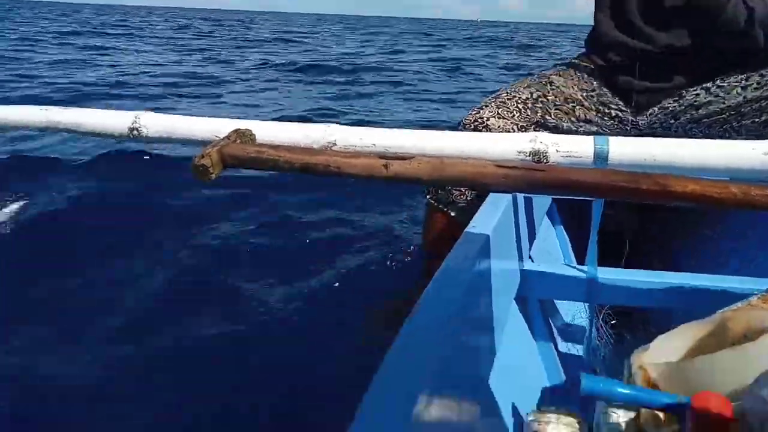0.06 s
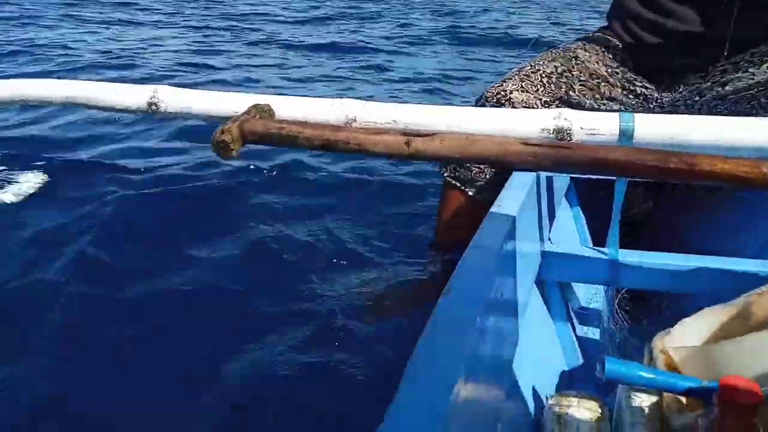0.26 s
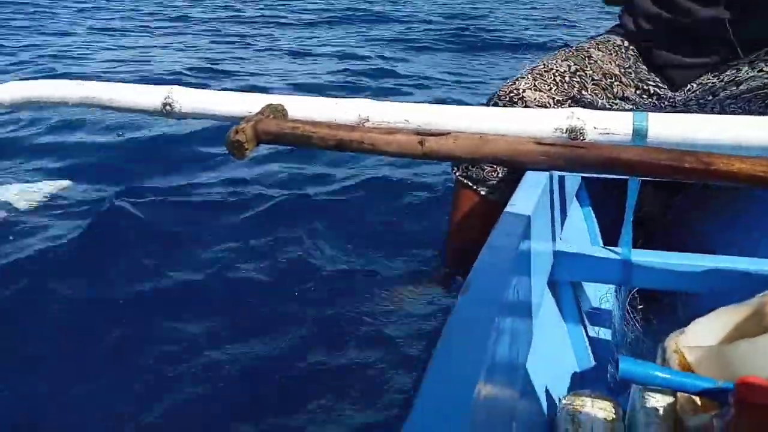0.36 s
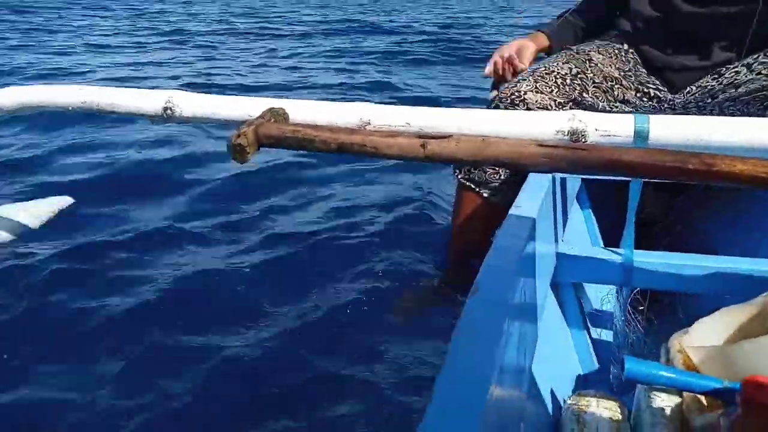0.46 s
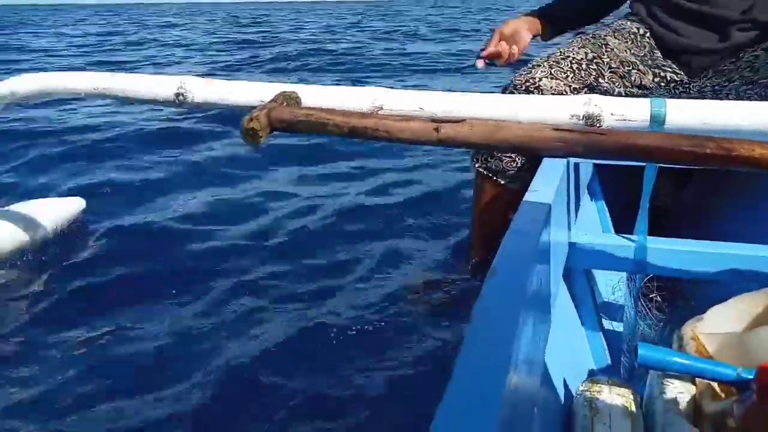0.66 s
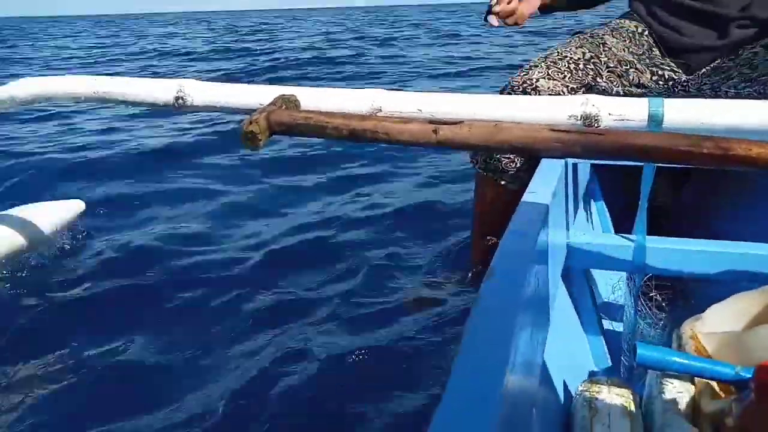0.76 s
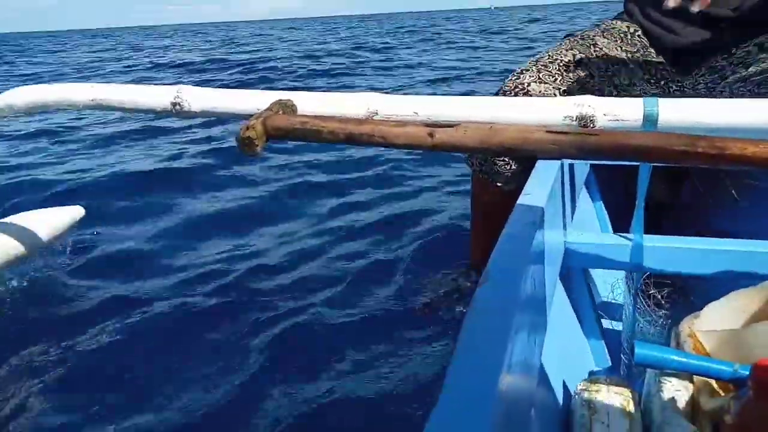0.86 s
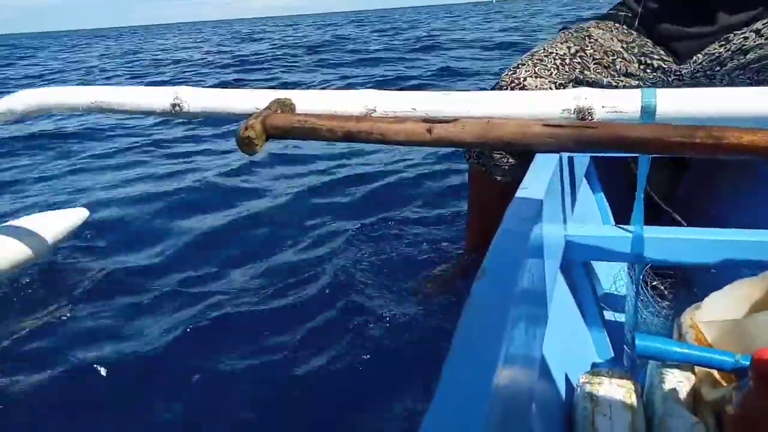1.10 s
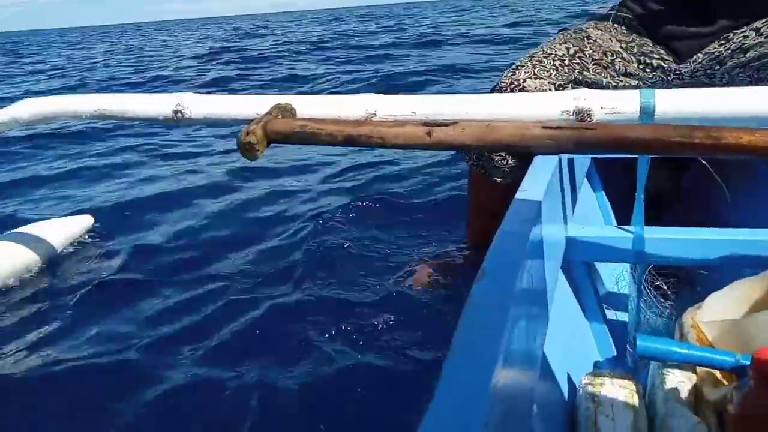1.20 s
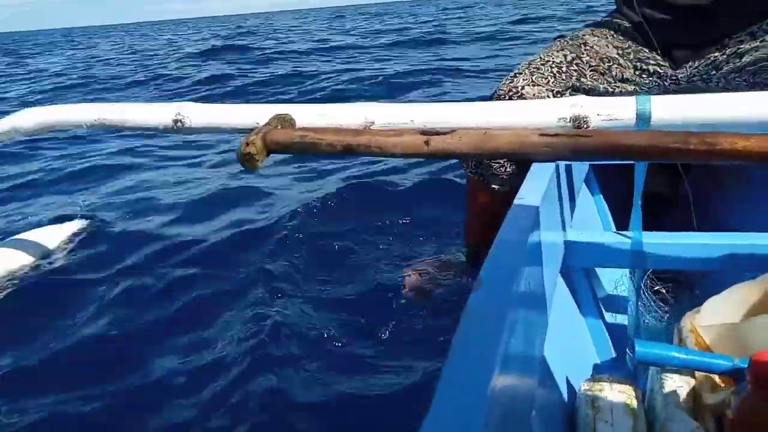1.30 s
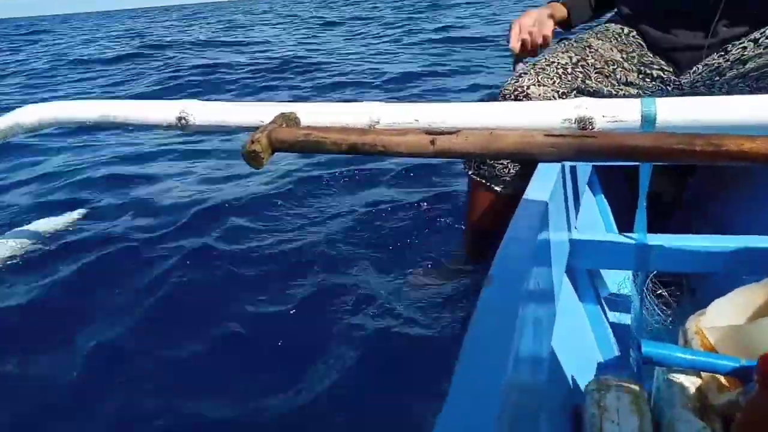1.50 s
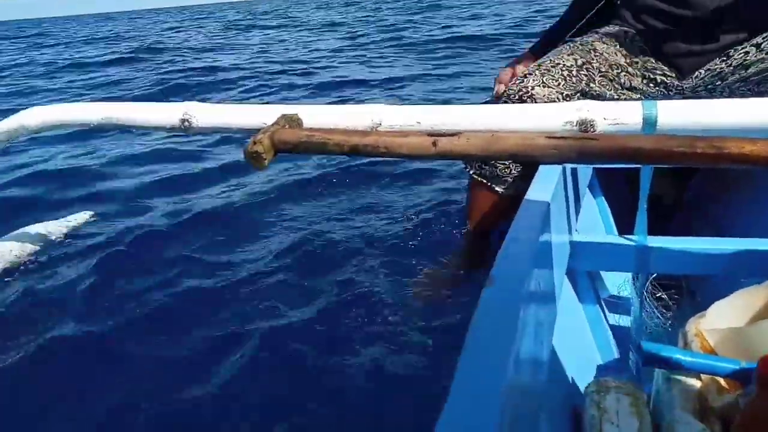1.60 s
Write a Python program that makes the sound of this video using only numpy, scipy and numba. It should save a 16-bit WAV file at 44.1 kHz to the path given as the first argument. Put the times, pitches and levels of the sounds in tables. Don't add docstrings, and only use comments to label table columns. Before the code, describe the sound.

Close phone pickup of wavelets against a wooden boat outdoors, bubbles plopping and pinging, a crisp splash of drops after the second lap, then sparse trickling over a faint low sea rumble.

```python
import sys
import numpy as np
from scipy import signal
from scipy.fft import rfft, irfft
from scipy.io import wavfile
from scipy.ndimage import uniform_filter1d
from numba import njit

SR = 44100
rng = np.random.default_rng(int(sys.argv[2]) if len(sys.argv) > 2 else 0)


def log_audio(samples):
    frames = np.atleast_2d(samples).T
    limited = np.clip(frames, -1, 1)
    pcm = np.round(limited * 32767).astype(np.int16)
    wavfile.write(sys.argv[1], SR, pcm)


def convert_level_to_amplitude(level_db):
    exponent = np.asarray(level_db, float) / 20
    return 10 ** exponent


N = 72765

# [f/Hz, level/dB per Hz]
DROP_TONE = [(600, -25.5), (2300, -11), (3600, -0.5), (4250, -7.5), (5300, -23), (8000, -23), (10800, -37),
             (15500, -41)]


def unit(x):
    return x / np.sqrt(np.mean(x ** 2))


def response(points, size=1024):
    hz, db = np.array(points).T
    grid_hz = np.arange(size // 2 + 1) * SR / size
    log_gain = np.interp(np.log(grid_hz + 1), np.log(hz), db) * np.log(10) / 20
    cepstrum = irfft(log_gain)
    cepstrum[1:size // 2] *= 2
    cepstrum[size // 2 + 1:] = 0
    return irfft(np.exp(rfft(cepstrum)))


def split(x):
    body = signal.sosfiltfilt(signal.butter(4, 4410, fs=SR, output="sos"), x)
    return body, x - body


def walk(rate):
    hold = int(SR / rate)
    levels = np.repeat(rng.standard_normal(N // hold + 1), hold)
    smooth = uniform_filter1d(uniform_filter1d(levels, hold), hold)
    return unit(smooth[:N])


def sizes(u, spread_db):
    return convert_level_to_amplitude(spread_db * np.minimum(-np.log(1 - u), 4))


def patter(share, spread_db):
    u = rng.random((N, 3)).T
    sign = np.sign(u[1] - .5)
    return unit((u[0] < share) * sign * sizes(u[2], spread_db))


@njit
def ring(at, hz, cycles, size):
    rise, swell_cycles = .02, 1.8
    y = np.zeros(N)
    for k in range(len(at)):
        start = int(at[k] * SR)
        life = cycles[k] * SR / hz[k]
        phase = 0.
        for j in range(min(int(2 * life), N - start)):
            phase += 2 * np.pi * hz[k] / SR * (1 + rise * j / life)
            swell = np.sin(min(1., j * hz[k] / SR / swell_cycles) * np.pi / 2) ** 2
            y[start + j] += size[k] * np.sin(phase) * np.exp(-3 * j / life) * swell
    return y


def swarm(hz, cycles, spread_db, count):
    u = rng.random((count, 4)).T
    pitch = hz[0] * (hz[1] / hz[0]) ** u[3]
    return unit(ring(u[0] * N / SR, pitch, cycles * (.5 + u[1]), sizes(u[2], spread_db)))


def bubbles(table, db):
    s, peak, hz, cycles = np.array(table, float).T.copy()
    return ring(s, hz, np.clip(cycles, 2, 40), convert_level_to_amplitude(peak + db))


def lap_levels(t):
    # [t/s, spray level/dB, gurgle above spray/dB]
    lap_tables = [
        [(.225, -48, -5.5), (.237, -30, -12.5), (.259, -42.5, -4.5), (.315, -40, 1), (.371, -45, -4.5),
         (.42, -36.5, -9), (.455, -43.5, -13.5), (.485, -44.5, -2), (.53, -48.5, -9)],
        [(.585, -50.5, -9.5), (.594, -32, -30), (.619, -42, 6.5), (.671, -28.5, -2), (.795, -30, -5.5),
         (.829, -41.5, 1.5), (.87, -41.5, -4), (.9, -35.5, -16), (.943, -38, -4.5)],
        [(.96, -32, -23), (.976, -18, -26), (1.02, -28, -20.5), (1.028, -29, -16.5), (1.052, -24.5, -28.5),
         (1.086, -31.5, -15), (1.142, -32.5, -19), (1.158, -46.5, -12)],
        [(1.172, -32.5, -24.5), (1.186, -30, -15), (1.208, -28, -12.5), (1.224, -37, -11), (1.25, -42.5, -16),
         (1.258, -28.5, -22), (1.28, -30, -25.5), (1.297, -57, -10)],
    ]
    # [t/s, spray level/dB, gurgle above spray/dB]
    trickle = [
        [(0, -61, 4), (.03, -57.5, 0.5), (.1, -65, 7), (.148, -50.5, -14), (.2, -49, -5)],
        [(1.34, -50.5, -11), (1.4, -59.5, -9), (1.45, -54, -25), (1.52, -60.5, -39), (1.55, -55.5, -25),
         (1.6, -50.5, -12.5)],
    ]
    s, level_db, gurgle_extra_db = np.vstack([trickle[0], *lap_tables, trickle[1]]).T
    spray_db = np.interp(t, s, level_db)
    return spray_db, spray_db + np.interp(t, s, gurgle_extra_db)


def spray_patter(t, spray_db, wet):
    # [t/s, length/s, extra level/dB]
    mist_cloud = (1.053, 0.097, 5.5)
    clicks = patter(.03, spread_db=3)
    fine = patter(.08, spread_db=3.5) * convert_level_to_amplitude(3 * walk(45))
    body, treble = split(unit(np.pad(response(DROP_TONE), 64)) / 32)
    gain = convert_level_to_amplitude(spray_db - 2)
    s, length, extra_db = mist_cloud
    mist = convert_level_to_amplitude(extra_db * np.exp(-((t - s) / length) ** 2))
    body_clicks = (1 - 0.51 * wet) * clicks * gain * convert_level_to_amplitude(3.18 * walk(51.7))
    treble_clicks = (0.11 * clicks + 0.54 * fine) * (1 - .5 * wet)
    treble_clicks *= 0.049 * (gain / 0.076) * mist
    spray = signal.fftconvolve(body_clicks, body) + signal.fftconvolve(treble_clicks, treble)
    no_rumble = signal.butter(2, 560, "highpass", fs=SR, output="sos")
    return signal.sosfilt(no_rumble, spray[64:N + 64])


def foam(t):
    # [t/s, length/s, level/dB]
    bursts = [
        (1.19, 0.013, -50),
        (1.201, 0.017, -44),
    ]
    level = sum(convert_level_to_amplitude(db) * np.exp(-((t - s) / length) ** 2) for s, length, db in bursts)
    return swarm((5160, 6570), cycles=10, spread_db=0, count=6000) * level


def laps(t):
    spray_db, gurgle_db = lap_levels(t)
    wet = np.clip((gurgle_db - spray_db + 26) / 18, 0, 1)
    spray = spray_patter(t, spray_db, wet)
    fizz = swarm((1298, 4017), cycles=7.9, spread_db=0, count=1800)
    fizz *= convert_level_to_amplitude(spray_db - 1.5 + 2.33 * walk(60.3)) * wet
    gurgle = swarm((544.4, 1087), cycles=6.2, spread_db=3.5, count=800) * convert_level_to_amplitude(gurgle_db + 0.5)
    drips = swarm((4270, 8130), cycles=10, spread_db=3, count=450)
    drips *= convert_level_to_amplitude(-67 + 0.76 * (spray_db + 38))
    return drips + spray + fizz + gurgle + foam(t)


def plops():
    # [t/s, peak/dB, f/Hz, ringing/cycles]
    large = [(0.175, -36.5, 845, 22), (0.281, -38, 560, 10), (0.303, -27, 813, 12.5),
             (0.399, -28, 720, 8.8), (0.414, -28.5, 688, 26), (0.427, -33, 665, 9), (0.48, -36, 874, 33),
             (0.607, -21.5, 471, 8.7), (.418, -30, 445, 15.4), (.622, -24, 452, 8.1), (.69, -27.5, 415, 55),
             (.73, -28.5, 416, 23), (0.649, -6, 720, 6), (0.661, -15, 609.5, 21.6), (0.71, -14, 776, 21),
             (0.734, -18, 798, 14), (0.793, -21, 756, 17), (0.869, -29.5, 865, 30), (1.187, -26.5, 910, 28),
             (1.204, -19.5, 870, 5.2), (1.224, -31.5, 465, 17.5), (1.355, -30.5, 1210, 14),
             (1.388, -43, 1270, 41)]
    return bubbles(large, db=-1.5)


def pings():
    # [t/s, peak/dB, f/Hz, ringing/cycles]
    small = [(0.0892, -35.5, 1356, 33), (0.1381, -40, 2180, 36), (0.18, -24, 1490, 7.9),
             (0.2369, -10.5, 2380, 5.7), (0.2454, -19.5, 2060, 29), (0.3047, -28, 3870, 51),
             (0.3203, -14, 1480, 5.8), (0.381, -16, 1720, 17), (0.4193, -18, 2150, 14.5),
             (0.4311, -10.5, 3120, 8.8), (0.4803, -26, 1974, 38), (0.5143, -26, 2240, 14),
             (0.5446, -21.5, 3090, 9.7), (0.5932, -13.5, 1730, 18.5), (0.61, -10, 2400, 9.6),
             (0.6715, -13, 1435, 11), (0.7121, -12.5, 2310, 21), (1.1374, -17.5, 1886, 21),
             (1.1873, -6, 2410, 6.6), (1.276, -7.5, 2630, 5.6), (1.4705, -32, 4120, 14),
             (1.5319, -20, 3540, 47), (1.5423, -19.5, 2850, 30), (1.5696, -17.5, 3180, 8.6),
             (1.5911, -26.5, 1385, 19.4), (1.6047, -36, 1430, 5.7), (1.625, -32, 3770, 17),
             (0.4667, -27, 3550, 48), (0.593, -10.5, 2450, 14), (0.635, -16.5, 2370, 18),
            (1.257, -11.5, 3820, 15), (.017, -36, 3780, 39), (0.031, -40, 3500, 35), (.114, -36, 980, 9.9),
            (.143, -36, 3970, 35), (0.159, -35, 1450, 22), (0.169, -30.5, 3390, 13),
            (0.2805, -24, 1720, 12), (.558, -36, 2340, 30), (.575, -32, 4820, 20), (.649, -16, 3560, 35),
            (.662, -24, 2220, 15), (0.6988, -17.5, 3450, 22), (.723, -10, 2390, 12), (0.728, -14, 3130, 24),
            (0.746, -21, 1380, 29), (0.789, -27, 1480, 28), (.797, -21, 3620, 33), (0.8546, -16, 3900, 7.6),
            (0.8806, -35, 1300, 15), (1.281, -25, 2390, 33), (1.286, -41.5, 865, 50),
            (1.335, -39, 3640, 20), (1.371, -33, 2750, 22), (1.5365, -25, 3350, 29), (1.567, -41, 2100, 10),
            (1.574, -33, 3000, 22), (1.5917, -20, 2580, 6.7), (1.626, -30.5, 1290, 8)]
    return bubbles(small, db=-5) * convert_level_to_amplitude(1.4 * walk(350))


def ticks():
    # [t/s, peak/dB, extra treble/dB]
    drops = [(0.2338, -18, -32), (0.3046, -20, -26), (0.594, -20, 6), (0.855, -17.5, -15),
             (0.9685, -9, -15), (0.9722, -14, -7), (0.9784, -4, 5), (0.9814, -1, -7), (0.9906, -1.5, -6),
             (0.9962, -8, -7), (1.0038, 3, 2), (1.017, -5, 1), (1.0207, -15, -7), (1.0433, -13, -7),
             (1.0476, -8, -7), (1.0592, -18, -9), (1.0876, -21, -11), (1.101, -16, -11), (1.0564, -12, -15),
             (1.0634, -18.5, -2), (1.0654, -13, -1.5), (1.1109, -13, -4), (1.137, -18, 12),
             (1.2035, -10, -23), (1.206, -10.5, -9), (1.2442, -21, -14), (1.257, -16.5, 1),
             (1.2642, -13, 3)]
    s, peak_db, treble_db = np.array(drops).T
    drop = np.pad(response(DROP_TONE), 64)
    body, treble = split(drop / np.abs(drop).max())
    at = ((s + .001) * SR).astype(int)
    out = 0
    for part, extra_db in ((body, 0), (treble, np.minimum(treble_db, -7))):
        hits = np.zeros(N)
        np.add.at(hits, at, convert_level_to_amplitude(peak_db - 2.5 + extra_db))
        out = out + signal.fftconvolve(hits, part)[64:N + 64]
    return out


def spits():
    # [t/s, peak/dB]
    bursts = [(0.0138, -47), (0.0324, -53), (0.118, -71), (0.1405, -73), (0.2813, -57), (0.3535, -55),
              (0.3944, -54), (0.4178, -66), (0.489, -59), (0.515, -52), (0.562, -50), (0.591, -44),
              (0.6084, -46), (0.6348, -39.5), (0.6552, -48), (0.798, -55), (0.8908, -43.5), (0.9265, -56),
              (1.2448, -56), (1.309, -43), (1.3325, -55.5), (1.3883, -59), (1.4173, -63), (1.4477, -54),
              (1.471, -57), (1.492, -56), (1.5166, -67), (1.531, -51), (1.578, -53), (1.6137, -57)]
    s, peak_db = np.array(bursts).T
    starts = np.zeros(N)
    np.add.at(starts, (s * SR).astype(int), convert_level_to_amplitude(peak_db - 7))
    fade = convert_level_to_amplitude(-60 / .03 / SR)
    level = signal.lfilter([1], [1, -fade], starts)
    band = signal.butter(2, (4740, 9300), "bandpass", fs=SR, output="sos")
    hiss = unit(signal.sosfilt(band, rng.standard_normal(N)))
    return level * hiss / 2


def hull_echo(near):
    s = np.arange(4410) / SR
    tail = rng.standard_normal(4410) * convert_level_to_amplitude(-60 * s / .04)
    tail /= np.sqrt(np.sum(tail ** 2))
    return convert_level_to_amplitude(-13) * signal.fftconvolve(near, tail)[:N]


def knocks():
    # [t/s, peak/dB, f/Hz, ringing/cycles]
    bumps = [
        (0.018, -32.5, 115.4, 6),
        (0.034, -32, 166, 3.1),
        (0.535, -30.5, 143, 4.4),
        (0.77, -29, 173, 4.7),
        (0.818, -35, 77, 5),
        (0.998, -38, 135, 11),
    ]
    return bubbles(bumps, db=0.1)


def sea():
    # [f/Hz, level/dB per Hz]
    sea_tone = [(28, -21), (70, -6.5), (165, 1.5), (270, -2), (450, -21), (1500, -22), (3700, -16),
                (5600, -38)]
    tone_hz, tone_db = np.array(sea_tone).T
    f = np.arange(N // 2 + 1) * SR / N + 1
    shape = convert_level_to_amplitude(np.interp(np.log(f), np.log(tone_hz), tone_db)) / (1 + (f / 8000) ** 4)
    flicker_db = 10.0 * walk(47.06) - 8
    out = 0
    for hz in 30 * 2. ** np.arange(10):
        octave = np.clip(1 - np.abs(np.log2(f / hz)), 0, 1) ** .5
        band = irfft(rfft(rng.standard_normal(N)) * shape * octave, N)
        out = out + band * convert_level_to_amplitude(1.6 * walk(12) + flicker_db * (hz > 400))
    return unit(out) * convert_level_to_amplitude(-51.5)


def scene():
    t = np.arange(N) / SR
    near = laps(t) + plops() + pings() + ticks() + spits()
    near = near + hull_echo(near)
    return (near + knocks() + sea())[None]


def roll_off(x):
    return signal.sosfilt(signal.butter(12, 15850, fs=SR, output="sos"), x)


def record(dry):
    return roll_off(dry)


dry = scene()
out = record(dry)
log_audio(out)
```